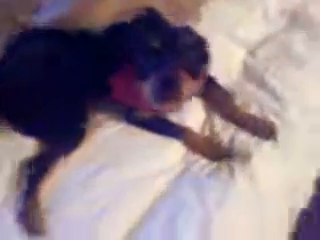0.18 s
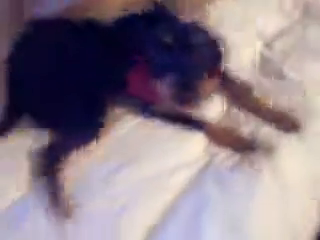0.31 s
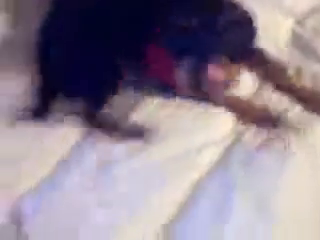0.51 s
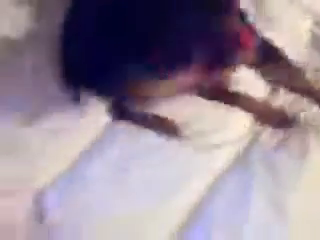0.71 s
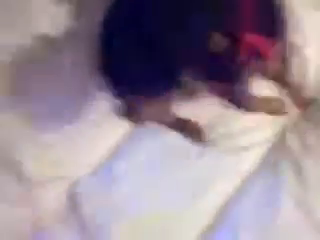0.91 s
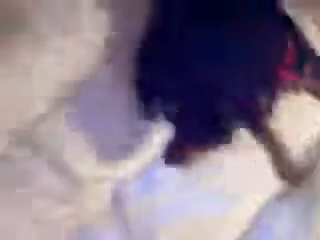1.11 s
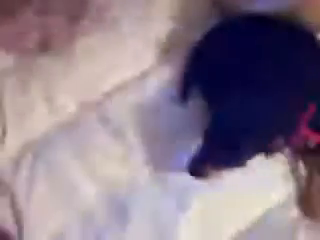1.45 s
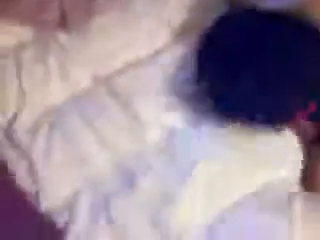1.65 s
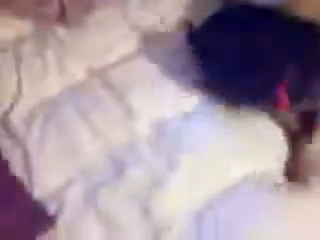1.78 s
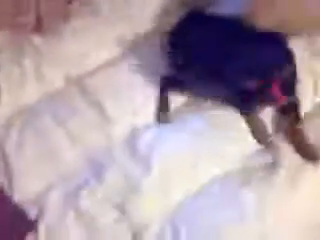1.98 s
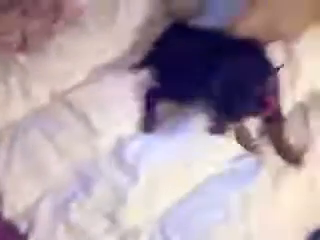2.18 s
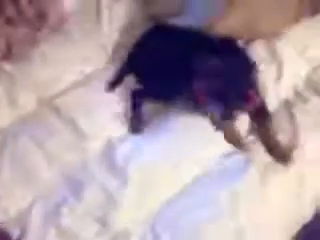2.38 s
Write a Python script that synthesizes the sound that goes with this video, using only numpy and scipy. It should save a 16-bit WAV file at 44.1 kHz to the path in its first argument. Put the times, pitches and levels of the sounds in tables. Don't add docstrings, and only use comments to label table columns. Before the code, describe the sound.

Sharp, crisp claw clicks come in evenly spaced clusters over rustling bedding, followed by a padded thud, sliding fabric, dull handling bumps and a light patter of claws, heard close in a soft, dry bedroom with faint hum.

```python
import sys
import numpy as np
from scipy import signal
from scipy.fft import rfft, irfft, next_fast_len
from scipy.io import wavfile
from scipy.ndimage import uniform_filter1d

SR = 44100
rng = np.random.default_rng(int(sys.argv[2]) if len(sys.argv) > 2 else 0)


def makeup_ratio(level_db):
    decades = np.asarray(level_db, float) / 20
    return 10 ** decades


def bounce(signal):
    frames = np.transpose(np.atleast_2d(signal))
    limited = np.clip(frames, -1, 1)
    pcm = np.round(limited * 32767).astype(np.int16)
    wavfile.write(sys.argv[1], SR, pcm)


N = 112454

# [Hz, dB]
PORT_DIFFERENCE = [
    (100, -10),
    (1000, -1.5),
    (3000, 1.5),
    (10000, -0.5),
]


def curve(table, x):
    hz, db = np.array(table, float).T
    return np.interp(np.log(np.maximum(x, 1)), np.log(hz), db)


def unit(x):
    return x / np.sqrt(np.mean(x ** 2))


def band(x, hz, q):
    b, a = signal.iirpeak(min(hz, .4 * SR), max(q, .3), fs=SR)
    return signal.lfilter(b, a, x)


def two_bands(x, hz, q, second_q):
    return band(band(x, hz, q), hz, second_q)


def add(out, start_s, x):
    i = max(int(start_s * SR), 0)
    out[:, i:i + x.shape[1]] += x[:, :N - i]


def mid_side(mid, side):
    return np.array([[mid], [side]])


def walk(rate_hz):
    hold = int(SR / rate_hz)
    steps = np.repeat(rng.standard_normal(N // hold + 1), hold)
    smooth = uniform_filter1d(uniform_filter1d(steps, hold), hold)
    return unit(smooth[:N])


def grainy(count):
    grains_per_s, grain_db, spread_db, decay_s = 500, -8, 3.5, 0.00073
    sizes = makeup_ratio(spread_db * np.minimum(rng.exponential(size=count), 2.5))
    kicks = (rng.random(count) < grains_per_s / SR) * sizes
    envelope = signal.lfilter([1], [1, -np.exp(-1 / (decay_s * SR))], kicks)
    return unit(rng.standard_normal((2, count)) * (1 + makeup_ratio(grain_db) * envelope))


def camera():
    # [Hz, dB per Hz]
    hiss_colour = [
        (30, -10.5),
        (150, -1.5),
        (400, -6.5),
        (900, -27.5),
        (2500, -18.5),
        (6000, -28),
        (14000, -19.5),
    ]
    hiss_db, hum_hz, hum_db, hum_fall_db, whine_hz, whine_db = -61.5, 93.6, -77, -1.5, 12094, -76
    t, f = np.arange(N) / SR, np.fft.rfftfreq(N, 1 / SR)
    spectrum = rfft(rng.standard_normal((2, N))) * makeup_ratio(curve(hiss_colour, f))
    hiss = unit(irfft(spectrum, N)) * makeup_ratio(hiss_db)
    hum = 0
    for k in range(5):
        hum = hum + makeup_ratio(hum_db + hum_fall_db * k) * np.cos(2 * np.pi * hum_hz * (k + 2) * t)
    whine_level = makeup_ratio(whine_db + 2 * walk(13))
    whine = whine_level * np.sin(2 * np.pi * np.cumsum(whine_hz + 3 * walk(30)) / SR)
    return hiss + np.array([whine, hum + 1.5 * np.roll(whine, 1)])


def cloth():
    # [s, dB, dB per octave]
    stirring = [(0.0, -81.5, -0.5), (0.17, -66, 1.5), (0.36, -60.5, 1.5), (0.6, -62.5, 0), (0.89, -60, 0.5),
                (1.07, -64, 0), (1.2, -66.5, 0), (1.33, -65, 0), (1.5, -65, 0), (1.62, -68, 0),
                (1.75, -67, 0), (1.88, -66, 0), (2.03, -75, 0), (2.12, -71, 0), (2.25, -72, 0),
                (2.37, -69, 0), (2.47, -70, 0), (2.55, -75, 0)]
    # [Hz, dB per Hz]
    cloth_colour = [
        (60, -22),
        (150, 4),
        (400, -2),
        (1000, -21.5),
        (2000, -14),
        (4000, -26),
        (8000, -15),
        (14000, -22.5),
    ]
    t, start_s, level_db, tilt_db = np.arange(N) / SR, *np.array(stirring).T
    tilt_db = np.interp(t, start_s, tilt_db)
    out, noise, gust_db = 0, grainy(N), 1.2 * walk(14)
    for hz in 70 * 2 ** np.arange(0, 7.8, .5):
        db = curve(cloth_colour, hz) + 2.2 * walk(18) + gust_db + tilt_db * np.log2(hz / 1500)
        out = out + band(noise, hz, 1.77) * makeup_ratio(db + mid_side(0, curve(PORT_DIFFERENCE, hz)))
    return out * makeup_ratio(11.5 + np.interp(t, start_s, level_db))


def swishes():
    # [s, s, dB, Hz]
    slides = [(0.267, 0.097, -63.5, 8600), (.39, 0.056, -69.5, 1070), (0.472, 0.054, -59, 1200),
              (0.649, 0.033, -57.5, 1070), (0.766, 0.035, -66, 1100), (.90, 0.064, -57, 1030),
              (1.036, 0.078, -59.5, 8000), (1.05, 0.11, -62, 1120), (1.384, 0.055, -56, 1204),
              (1.389, 0.047, -61, 3700), (1.478, .06, -57.5, 890), (1.80, .16, -59.5, 800),
              (1.836, 0.13, -54.5, 8640), (1.93, 0.054, -64.5, 850), (2.089, .05, -62, 5700),
              (2.468, 0.073, -69, 650), (1.304, 0.086, -64.5, 334), (1.547, 0.073, -67, 332),
              (1.763, .11, -54, 370), (2.19, .05, -62, 400), (2.07, .05, -64, 380), (2.52, .05, -63, 380),
              (1.81, .1, -64, 3600), (2.336, 0.11, -66, 3250), (2.455, .015, -61, 3600),
              (1.943, 0.069, -61.5, 10500), (1.512, 0.065, -66, 3200), (2.362, 0.065, -59, 370),
              (0.152, 0.037, -73, 690), (1.027, 0.044, -76, 3600), (1.835, .05, -56, 700)]
    out, noise = np.zeros((2, N)), grainy(N)
    for middle_s, length_s, db, hz in slides:
        count = int(2 * length_s * SR)
        i = int(middle_s * SR * 0.89)
        slide = unit(two_bands(noise[:, i:i + count], hz, 0.87, 0.87)) * np.hanning(count) ** 2.4
        add(out, middle_s - length_s, slide * makeup_ratio(mid_side(db, db + curve(PORT_DIFFERENCE, hz))))
    return out


def bumps():
    # [s, peak dB, Hz]
    hand_knocks = [
        (1.60, -46, 100),
        (1.831, -51, 150),
        (1.99, -54, 130),
        (2.152, -44, 200),
    ]
    out, t = np.zeros((2, N)), np.arange(4000) / SR
    decay_cycles = 1.5
    for start_s, db, hz in hand_knocks:
        knock = makeup_ratio(db) * np.sin(2 * np.pi * hz * t) * np.exp(-t * hz / decay_cycles)
        add(out, start_s, knock * mid_side(.3, 1))
    return out


def rings():
    # [s, peak dB, Hz, s]
    hollow_notes = [(.3680, -20.5, 1150, 0.008), (.5058, -35, 1080, 0.018), (.6214, -24, 1120, 0.017),
                    (.7427, -26, 1060, .022), (.7408, -31, 1150, .008), (.7545, -46, 950, .04),
                    (0.8741, -33, 1060, 0.034), (1.0030, -33, 1120, 0.028), (.9982, -28, 1150, .006),
                    (.140, -48.5, 406, 0.052), (0.9977, -26.5, 365, 0.021), (.6185, -38, 500, 0.016),
                    (0.7375, -40, 480, 0.018), (.364, -42, 350, .015), (0.87, -33.5, 450, 0.015),
                    (1.117, -49.5, 360, 0.065), (1.347, -47.5, 310, 0.058), (1.460, -27.5, 140, 0.077),
                    (1.4625, -38, 400, .03), (0.5016, -35, 480, .02), (0.82, -42.5, 125, 0.068),
                    (.44, -45, 110, 0.07), (1.722, -47.5, 405, 0.063), (1.832, -49, 610, .015),
                    (.741, -37, 275, 0.036), (1.971, -55, 790, 0.023), (2.3055, -48, 1180, 0.011),
                    (2.4637, -47, 430, 0.02), (2.4535, -51, 480, .025), (2.4762, -50, 500, .015),
                    (2.489, -51, 480, .015), (1.380, -50, 1330, .03), (1.806, -52, 860, .04),
                    (1.919, -55, 480, .03), (2.312, -53, 400, .03)]
    # [s, peak dB, Hz]
    tip_knocks = [(.2272, -42, 3300), (0.2282, -39, 2260), (.2305, -47, 4000), (1.4633, -38, 1350),
                  (1.4695, -47, 1500), (2.1548, -47, 3400), (.3668, -37, 4400), (.9990, -32, 4800),
                  (.3639, -36, 3600), (.3660, -31, 3660), (.5028, -41.5, 3630), (0.506, -43, 3600),
                  (.6186, -39, 2100), (.6194, -34, 3800), (.6217, -36, 3300), (0.7379, -36, 3330),
                  (.7410, -34, 3270), (.7430, -36, 3200), (.8704, -35, 3300), (.8730, -34.5, 3340),
                  (0.9979, -29, 3240), (0.9995, -27, 3300), (1.0008, -18.5, 3520), (2.1548, -37.5, 1780),
                  (2.4363, -47, 3900), (2.4378, -47, 3900), (2.4410, -47, 3900), (2.4425, -49, 3900),
                  (2.4445, -47, 3800), (2.4458, -47, 3800), (2.4365, -53, 6100), (1.0010, -26, 4800),
                  (2.5310, -54, 6000), (.9981, -33, 6000), (1.0012, -32, 5900), (.8738, -42, 6000),
                  (2.4448, -51, 6100)]
    knock_db, knock_t60_s = 2.5, .0045
    rise_cycles, side_db, thud_rough = 0.51, -8.5, 0.44
    out, t = np.zeros((2, N)), np.arange(6000) / SR
    notes = list(hollow_notes) + [(s, db + knock_db, hz, knock_t60_s) for s, db, hz in tip_knocks]
    for start_s, db, hz, t60_s in notes:
        tone = np.sin(2 * np.pi * hz * t)
        if hz < 900:
            tone = tone + thud_rough * unit(two_bands(rng.standard_normal(len(t)), 1.14 * hz, 1.1, 1.1))
        note = tone * np.clip(t * hz / rise_cycles, 0, 1) * makeup_ratio(db - 60 * t / t60_s)
        add(out, start_s, note * makeup_ratio(mid_side(0, side_db + 4.9 * np.log2(hz / 1000))))
    return out


def claws():
    # [s, dB, dB, crack centre Hz]
    ticks = [(.2270, -32.5, -28.5, 9500), (0.228, -31.5, -26.5, 9700), (0.3639, -28.5, -34, 9200),
             (.3657, -31, -29, 9200), (.3662, -40, -30, 12000), (.3668, -25, -33, 9100),
             (.3680, -30, -38, 9500), (0.4402, -60, -35, 9200), (.4411, -60, -37, 8800),
             (0.5017, -27, -44, 9500), (.5030, -30, -42, 9600), (.5057, -28, -46, 11500),
             (.6181, -30, -42, 9100), (.6190, -32, -44, 9200), (0.6197, -32, -36, 9300),
             (0.6216, -32, -38, 9300), (0.7373, -25.5, -48, 9000), (0.7407, -26, -40, 9400),
             (.7422, -30, -39, 9400), (0.8704, -21, -42, 9200), (0.8727, -22, -35, 11700),
             (.8729, -40, -36, 9200), (0.9977, -27, -25, 9200), (.9981, -20, -30, 9300),
             (0.9992, -29, -28, 9102), (1.0005, -22, -24, 11000), (1.0012, -20, -15, 9000),
             (1.0013, -28, -15, 12000), (1.4636, -30, -60, 4000), (1.4695, -42, -52, 4000),
             (.2298, -55, -40, 6600), (.2312, -55, -38, 8800), (.2322, -55, -40, 6600),
             (.2395, -60, -45, 9000), (2.1515, -42, -67, 3500), (2.1548, -32, -67, 3500),
             (2.4363, -43.5, -39.5, 5700), (2.4439, -52, -42.5, 5800), (2.4528, -50, -54, 9500),
             (2.4635, -44, -46, 12800), (2.4760, -44, -50, 8000), (2.4887, -45, -50, 10500),
             (1.8325, -42, -55, 8000), (1.350, -44, -60, 4000), (1.363, -48, -60, 4000),
             (1.975, -50, -62, 4000), (2.3065, -46, -60, 4000)]
    push_s, snap_s, push_side_db = 0.00032, .00008, -7.5
    crack_s, crack_q, crack_rough, crack_gain_db, crack_side_db = .0006, 2.0, 1.6, -2.5, -0.5
    out, t = np.zeros((2, N)), np.arange(400) / SR
    loading, release = np.sin(np.pi / 2 * t / push_s) ** 2, np.exp(-(t - push_s) / snap_s)
    push = np.where(t < push_s, loading, release)
    push = signal.lfilter(*signal.butter(1, 450, "high", fs=SR), push)
    push = np.array([push, makeup_ratio(push_side_db) * 4 * np.gradient(push)])
    for start_s, push_db, crack_db, hz in ticks:
        tone = np.array([np.sin(2 * np.pi * hz * t), np.cos(2 * np.pi * hz * t)])
        rough = tone + crack_rough * rng.standard_normal((2, len(t)))
        burst = rough * t / crack_s * np.exp(-2 * t / crack_s)
        crack = two_bands(burst, hz, crack_q, crack_q / 2)
        crack = crack / np.abs(crack).max(axis=1, keepdims=True) * makeup_ratio(mid_side(0, crack_side_db))
        crack = crack * mid_side(1, hz / 8500)
        add(out, start_s, makeup_ratio(push_db) * push + makeup_ratio(crack_db + crack_gain_db) * crack)
    return out


def room(x):
    t60_s, level_db, top_hz = .16, -23, 5000
    t = np.arange(int(.25 * SR)) / SR
    tail = rng.standard_normal((2, len(t))) * makeup_ratio(-60 * t / t60_s) * np.clip(t / 0.0013, 0, 1)
    tail = signal.lfilter(*signal.butter(1, top_hz, fs=SR), tail)
    tail = tail / np.sqrt(np.sum(tail ** 2, axis=1, keepdims=True))
    return makeup_ratio(level_db) * signal.fftconvolve(x, tail, axes=1)[:, :N]


def scene():
    hits = claws() + rings()
    mid, side = camera() + cloth() + swishes() + bumps() + hits + room(hits)
    return np.array([mid + side, mid - side])


def roll_off(x):
    return signal.sosfilt(signal.butter(12, 15010, fs=SR, output="sos"), x)


def record(dry):
    notch_hz, cross_top_hz, cross_treble = 2605, 4900, .52
    n = next_fast_len(N + 512)
    f = np.fft.rfftfreq(n, 1 / SR)
    delay = np.exp(-2j * np.pi * f / notch_hz)
    dulling = cross_treble + (1 - cross_treble) / (1 + (f / cross_top_hz) ** 8)
    ports = rfft(dry, n)
    wide = irfft(ports - delay * dulling * ports[::-1], n)[:, :N] * .6
    wide = signal.sosfilt(signal.butter(3, 80, "high", fs=SR, output="sos"), wide)
    wide = signal.sosfilt(signal.ellip(6, .3, 24, 13850, fs=SR, output="sos"), wide)
    return roll_off(wide)


dry = scene()
out = record(dry)
bounce(out)
```